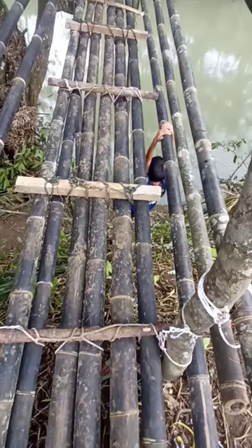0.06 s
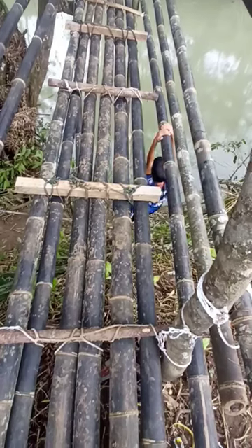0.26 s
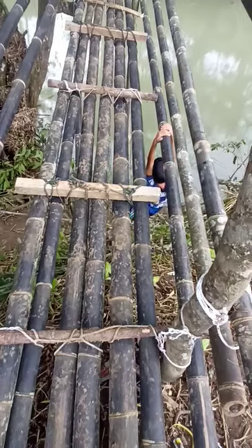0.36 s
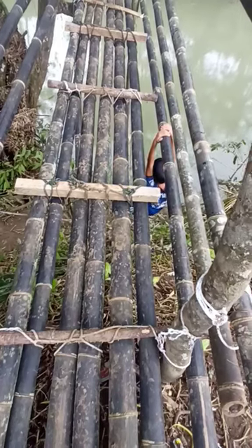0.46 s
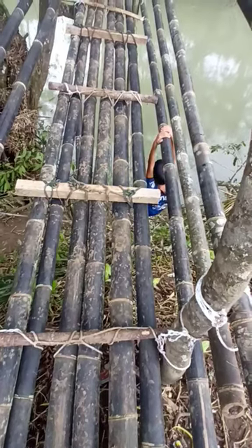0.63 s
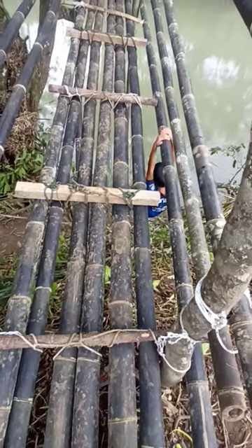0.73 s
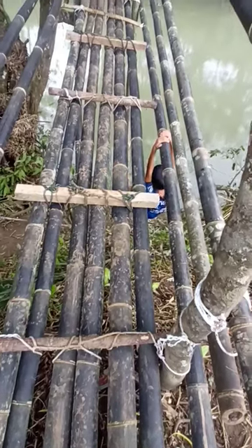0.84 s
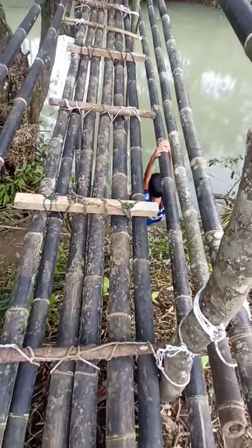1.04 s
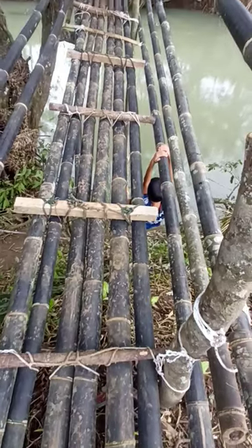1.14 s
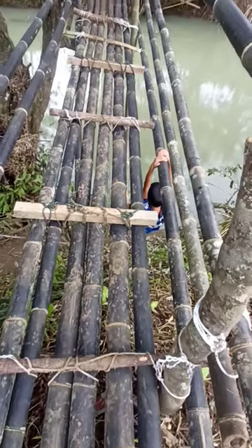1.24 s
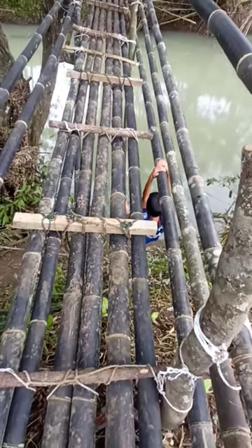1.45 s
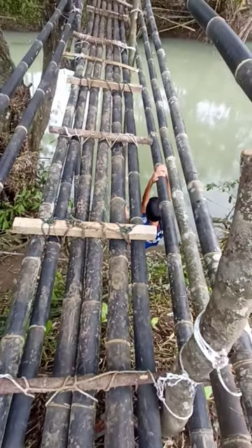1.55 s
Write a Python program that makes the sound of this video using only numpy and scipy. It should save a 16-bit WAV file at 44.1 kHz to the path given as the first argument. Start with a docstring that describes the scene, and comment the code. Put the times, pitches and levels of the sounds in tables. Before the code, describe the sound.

One sharp, dry bamboo knock, with light wind buffeting the microphone over faint outdoor hiss.

```python
"""On a bamboo footbridge over a pond, light wind buffets the microphone: each passing eddy is a
soft low thump of pressure, and they crowd into one gust in the middle. An impact on the poles,
or from handling, gives one sharp dry knock of damped modes with a short hissing tail; a few tiny
ticks follow. Behind them are two thin high whistles, a faint far tone sliding down, and
background hiss, turned up and down by the recorder's noise suppressor."""
import sys
import numpy as np
from scipy import signal
from scipy.fft import rfft, irfft
from scipy.io import wavfile

SR = 44100
rng = np.random.default_rng(int(sys.argv[2]) if len(sys.argv) > 2 else 0)


def materialize(psi):
    """Save the field psi as 16-bit PCM at rate SR to the path in sys.argv[1].

    A 1-D psi becomes a single channel; in a 2-D psi each row is a channel.
    """
    bounded = np.clip(np.atleast_2d(psi).T, -1, 1)
    quanta = np.round(bounded * 32767).astype(np.int16)
    wavfile.write(sys.argv[1], SR, quanta)


N = 70560
TIME = np.arange(N) / SR


def from_db(db):
    """Amplitude ratio: a factor of ten for every 20 dB."""
    return 10 ** (np.asarray(db) / 20)


def envelope(points):
    """Amplitude envelope, linear in decibels between (time [s], level [dB]) points."""
    return from_db(np.interp(TIME, *np.transpose(points)))


def coloured_noise(spectrum):
    """Spectral shaping: white noise weighted in frequency, then scaled to unit rms."""
    hz, db = np.transpose(spectrum)
    bin_hz = np.maximum(np.fft.rfftfreq(N, 1 / SR), 1)
    gain = from_db(np.interp(np.log(bin_hz), np.log(hz), db))
    noise = irfft(rfft(rng.standard_normal(N)) * gain, N)
    return noise / noise.std()


def damped_mode(start, hz, t60):
    """Free vibration of a damped oscillator: a sine that falls 60 dB in t60 seconds."""
    age = np.maximum(TIME - start, 0)
    return np.sin(2 * np.pi * hz * age) * from_db(-60 * np.minimum(age / t60, 5))


# Hiss level as the noise suppressor leaves it: (time [s], level [dB])
HISS_ENVELOPE = [(0, -64.5), (.15, -63), (.24, -57), (.355, -55.5), (.385, -63), (.44, -61), (.5, -56.5),
                 (.6, -58), (.622, -63.5), (.68, -56.5), (.98, -55.5), (1.025, -59), (1.24, -62),
                 (1.32, -55.5), (1.47, -55.5), (1.515, -62.5), (1.55, -63), (1.6, -56.5)]
# Spectral density of the hiss: (frequency [Hz], relative level [dB])
HISS_SPECTRUM = [(25, -19), (70, 1), (260, -1.5), (420, -3.5), (640, -5), (900, -12), (1200, -14.5),
                 (1650, -13.5), (2300, -21), (3000, -16), (3900, -11.5), (5200, -15), (6700, -15.5),
                 (8100, -12), (10000, -24), (12500, -24.5), (15500, -18.5)]
def background_hiss():
    """Amplitude modulation: a set envelope stands for the suppressor turning the hiss up and down."""
    return envelope(HISS_ENVELOPE) * coloured_noise(HISS_SPECTRUM)


# Envelope of the rumble between eddies: (time [s], level [dB])
RUMBLE_ENVELOPE = [(0, -65), (.14, -62.5), (.2, -51.5), (.33, -52), (.38, -71), (.45, -58), (.56, -53.5),
                   (.61, -62), (.66, -53), (.74, -49.5), (.82, -39.5), (.95, -38), (1.01, -59.5),
                   (1.06, -50.5), (1.11, -62), (1.16, -59), (1.23, -71), (1.3, -52), (1.46, -52.5),
                   (1.54, -76), (1.6, -56)]
# Spectral density of the rumble: (frequency [Hz], relative level [dB])
RUMBLE_SPECTRUM = [(20, -33), (40, -14.5), (60, 0.5), (90, -3), (140, -14.5), (220, -14), (350, -26.5),
                   (600, -43), (1500, -74)]
# Eddies striking the microphone: (centre time [s], level [dB], frequency [Hz])
EDDIES = [(.187, -40, 87), (0.2322, -31, 130), (.246, -34, 84), (.281, -42, 92), (0.3109, -36, 100),
          (0.327, -36.5, 109), (0.4333, -43.5, 85.5), (0.462, -49, 87), (0.5519, -38.5, 87),
          (.656, -35.5, 97), (0.6788, -35.5, 112), (.697, -41, 84), (0.768, -29, 113), (0.7839, -24, 129.5),
          (0.804, -22.5, 125), (0.8201, -22, 118), (.833, -32, 248), (0.8431, -19.5, 158),
          (0.8568, -26, 94), (.88, -22.5, 115.5), (0.906, -28.5, 87), (0.943, -21.5, 113),
          (1.055, -41, 111), (1.2661, -36.5, 84), (1.3035, -44, 96), (1.3176, -36, 91),
          (1.3632, -35.5, 101), (1.408, -43.5, 82), (1.452, -44.5, 85), (1.568, -35, 102),
          (1.594, -40, 129)]
def wind(rise_cycles=0.45, fall_cycles=0.68):
    """Turbulent pressure fluctuation: each eddy is a quick suction and push over a low rumble."""
    pressure = envelope(RUMBLE_ENVELOPE) * coloured_noise(RUMBLE_SPECTRUM)
    for centre, db, hz in EDDIES:
        cycles = (TIME - centre) * hz
        width = np.where(cycles < 0, rise_cycles, fall_cycles)
        window = 1 / (1 + (cycles / width) ** 2 / 2) ** 2
        pressure += from_db(db) * window * np.sin(2 * np.pi * cycles)
    return pressure


# Far whistles, perhaps insects: (start [s], end [s], centre frequency [Hz], level [dB])
WHISTLE_BANDS = [(0.068, .27, 7340, -72.5), (0.628, 0.735, 7250, -68.5)]
def whistles(bandwidth_hz=260, fade_s=0.023):
    """Narrowband noise is heard as a thin, unsteady pitch at the centre of its band."""
    pressure = np.zeros(N)
    for start, end, hz, db in WHISTLE_BANDS:
        edges_hz = [hz - bandwidth_hz / 2, hz + bandwidth_hz / 2]
        bandpass = signal.butter(2, edges_hz, "band", fs=SR, output="sos")
        band = signal.sosfilt(bandpass, rng.standard_normal(N))
        fade = np.clip(np.minimum(TIME - start, end - TIME) / fade_s, 0, 1)
        pressure += from_db(db) * fade * band / band.std()
    return pressure


def far_tone(start_s=0.26, end_s=0.44, start_hz=653, fall_hz_per_s=192.6, db=-63, fade_s=0.038):
    """Linear glide: the phase of a faint pure tone is the integral of its falling frequency."""
    hz = start_hz - fall_hz_per_s * (TIME - start_s)
    fade = np.clip(np.minimum(TIME - start_s, end_s - TIME) / fade_s, 0, 1)
    return from_db(db) * fade * np.sin(2 * np.pi * np.cumsum(hz) / SR)


# Modes of the struck pole: (frequency [Hz], level [dB], decay time T60 [s])
POLE_MODES = [(1640, -43, 0.0032), (2684, -38, 0.0062), (4030, -31.5, 0.0025), (5330, -37, 0.0026),
              (8900, -30, 0.0026), (10200, -35, .002), (12500, -34, 0.0017), (14300, -42, .0015)]
# Spectral density of the knock's hissing tail: (frequency [Hz], relative level [dB])
TAIL_SPECTRUM = [(300, -32), (1500, -6), (2300, -9.5), (3000, -2), (4200, 1), (6300, -3), (8500, 4),
                 (11500, -7), (15500, -1)]
def knock(start_s=0.4894, contact_s=0.00075, tail_rise_s=0.0046, tail_hold_s=0.022, tail_t60_s=0.11):
    """Impact excitation: a half-sine contact pulse, heavily damped modes, a thump and a brief hiss."""
    age = TIME - start_s
    contact = -from_db(-31) * np.sin(np.pi * np.clip(age / contact_s, 0, 1))
    pole = sum((-1) ** k * from_db(db) * damped_mode(start_s, hz, t60)
               for k, (hz, db, t60) in enumerate(POLE_MODES))
    # The body gives way just after the contact.
    thump = from_db(-23.5) * damped_mode(start_s + 0.00087, hz=215, t60=0.012)
    tail_rise = np.clip(age / tail_rise_s, 0, 1)
    tail_decay = from_db(-60 * np.maximum(age - tail_hold_s, 0) / tail_t60_s)
    tail = from_db(-50.5) * tail_rise * tail_decay * coloured_noise(TAIL_SPECTRUM)
    return contact + pole + thump + tail


# Tiny impacts: (time [s], level before the high-pass [dB], frequency [Hz])
TICK_IMPACTS = [(.6653, -33.5, 5500), (.6659, -44, 6200), (1.3271, -32.5, 6300), (1.3297, -32, 5340),
                (1.3300, -37, 8050)]
def ticks(t60_s=0.0015, low_cut_hz=3300):
    """Heavy damping: high modes die away so quickly that they are heard as clicks."""
    clicks = sum(from_db(db) * damped_mode(start, hz, t60_s) for start, db, hz in TICK_IMPACTS)
    highpass = signal.butter(2, low_cut_hz, "high", fs=SR, output="sos")
    return signal.sosfilt(highpass, clicks + 1e-18)


def scene():
    """Superposition: the pressures of all sources add at one microphone in the open air."""
    return (background_hiss() + wind() + whistles() + far_tone() + knock() + ticks())[None]


def record(dry):
    """Band limiting: a steep elliptic low-pass removes the highest treble."""
    cutoff_hz = 15700
    return signal.sosfilt(signal.ellip(12, .1, 80, cutoff_hz, fs=SR, output="sos"), dry)


dry = scene()
out = record(dry)
materialize(out)
```